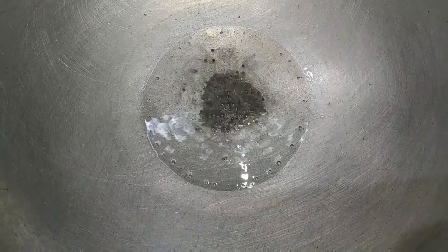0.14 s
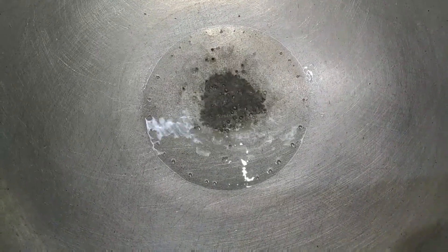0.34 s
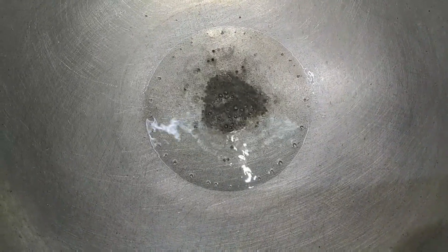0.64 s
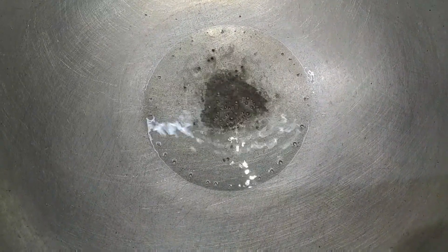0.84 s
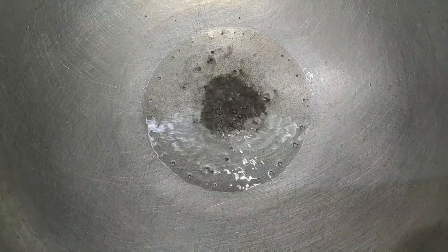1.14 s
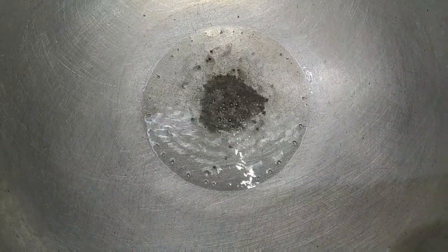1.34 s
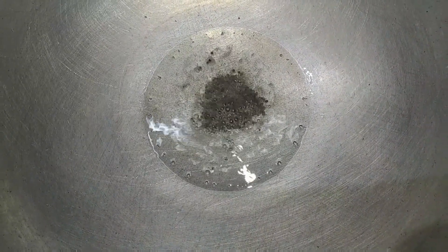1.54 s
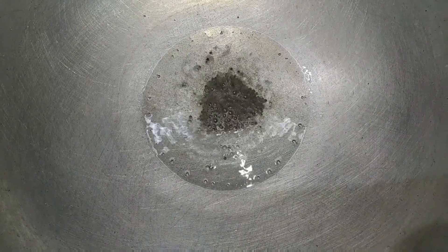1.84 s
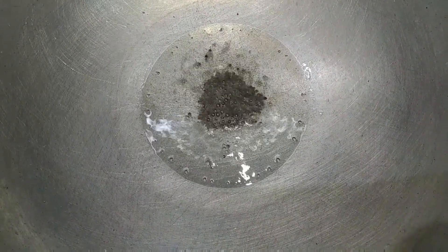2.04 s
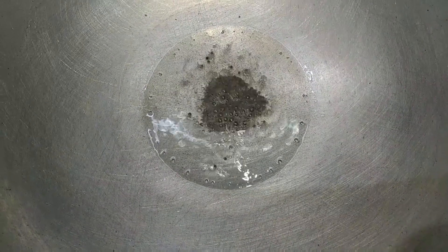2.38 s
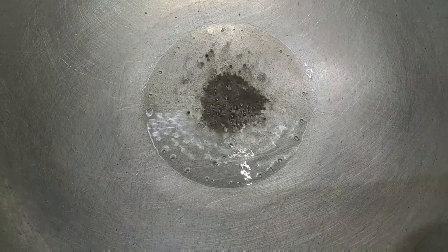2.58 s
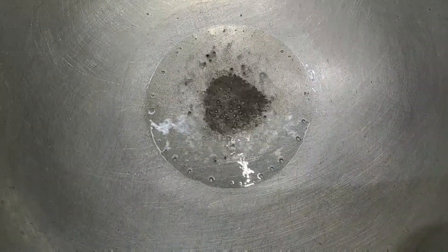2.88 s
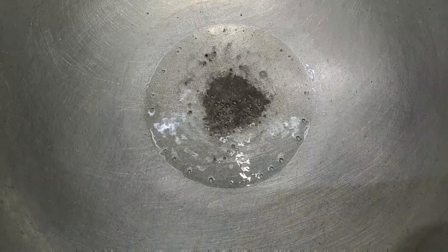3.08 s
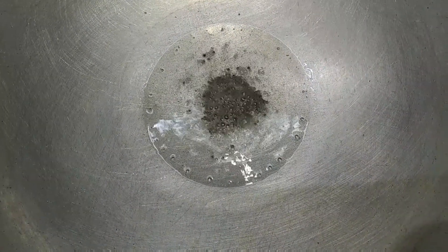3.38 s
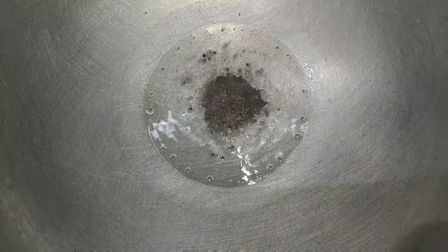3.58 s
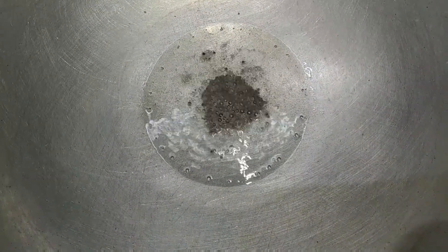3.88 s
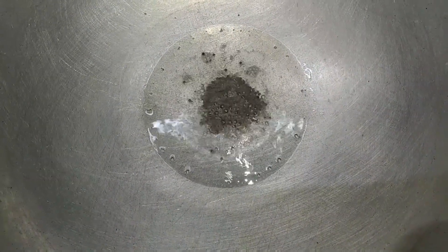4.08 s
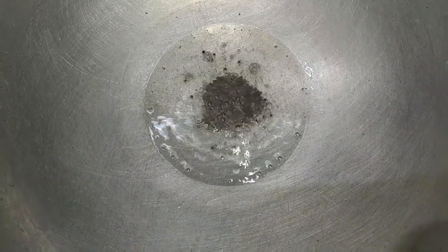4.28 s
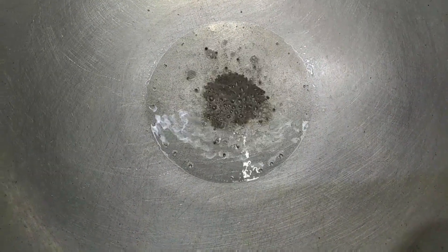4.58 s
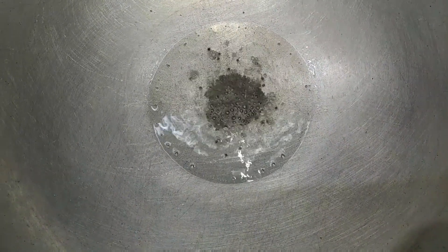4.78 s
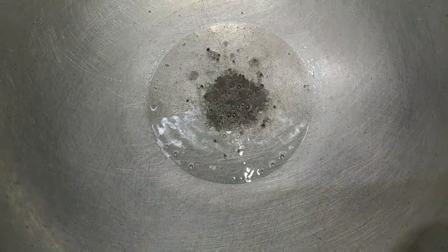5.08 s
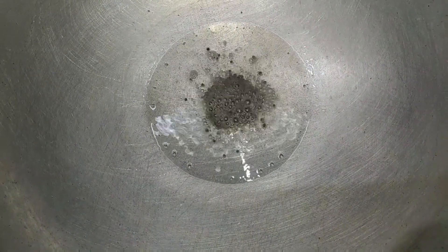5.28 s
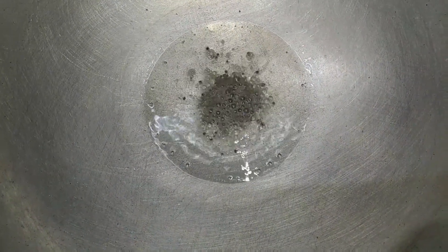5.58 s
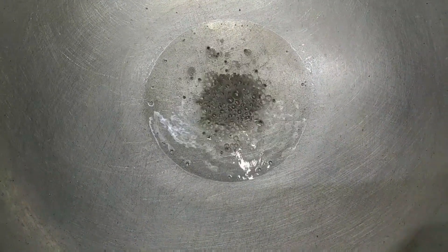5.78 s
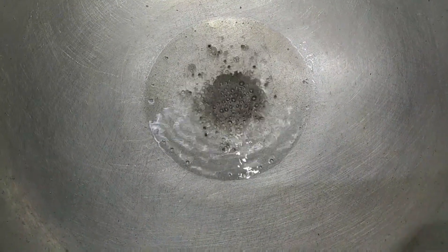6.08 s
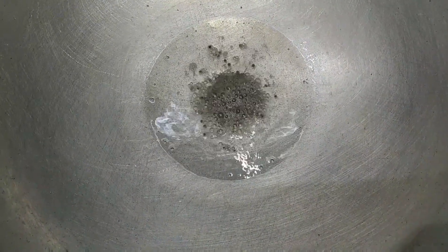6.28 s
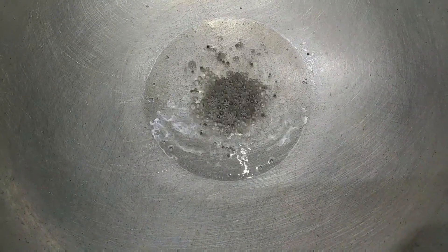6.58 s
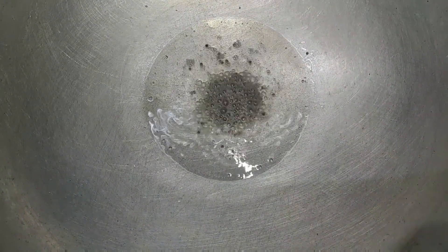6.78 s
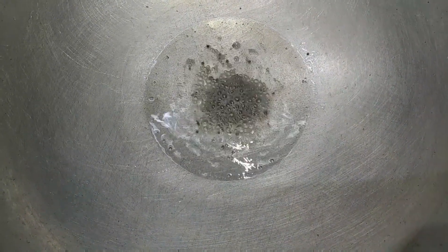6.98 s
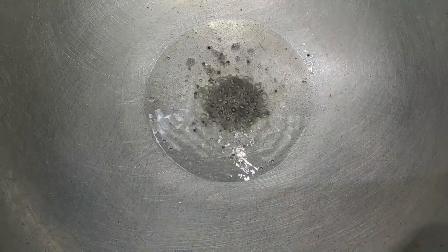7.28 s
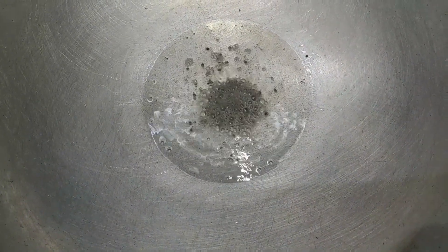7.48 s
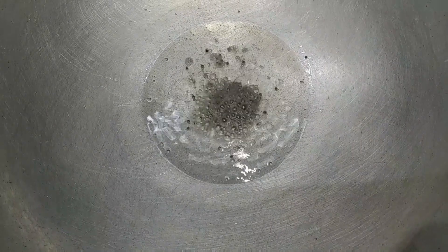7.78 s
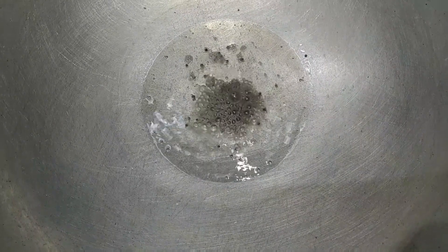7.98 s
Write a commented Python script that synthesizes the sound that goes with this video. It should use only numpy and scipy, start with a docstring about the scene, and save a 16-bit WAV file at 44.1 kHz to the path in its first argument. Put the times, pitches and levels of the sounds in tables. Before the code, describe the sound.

Seeds burst in hot oil in a metal bowl-shaped pan, heard close in stereo with a short, lightly reverberant kitchen echo. Pops begin sparse and weak apart from a sharp pair near one second, then gather from the middle onward into lively, uneven crackle, strongest around six seconds. Beneath them lie quiet fine sizzle, a thin whistling hiss, burner rumble, soft hum and a barely heard deep drone.

```python
"""First a soft fizz of oil, a thin high hiss and a low burner rumble; then mustard seeds splutter in a steel pan.
Each husk cracks and lets out a puff of steam: a sharp pulse, shaped noise and one short note, split into bands.
The pops ring the pan and a small kitchen, throw crackling droplets, and crowd together as the oil heats.
Fizz is many tiny grains of noise; hiss, whir and drone are noise through narrow resonances; the hum is a sine
with a little such noise. The drone has sine-based swells."""
import sys
import numpy as np
from scipy import signal
from scipy.fft import rfft, irfft
from scipy.io import wavfile
from scipy.ndimage import uniform_filter1d

SR = 44100
rng = np.random.default_rng(int(sys.argv[2]) if len(sys.argv) > 2 else 0)


def materialize(psi):
    """Save the field psi as 16-bit PCM at rate SR to the path in sys.argv[1].

    A 1-D psi becomes a single channel; in a 2-D psi each row is a channel.
    """
    bounded = np.clip(np.atleast_2d(psi).T, -1, 1)
    quanta = np.round(bounded * 32767).astype(np.int16)
    wavfile.write(sys.argv[1], SR, quanta)


N = 358974
TIME = np.arange(N) / SR

# Bursting seeds: start_s, level_db (rms over POP_S, before the colour of the bowl), pitch_hz,
# puff_t60_s (time to fall 60 dB), body_db (low band), snap_db (high band); both against the middle band
SEED_POPS = [(0.3783, -54, 4350, 0.012, -7.5, 5), (0.7779, -46.5, 5330, 0.013, -11, 1.5),
             (0.863, -45, 3690.0, 0.0084, 0.5, 8), (0.9392, -50, 2580.0, 0.014, -0.5, -8),
             (0.9812, -35, 2610, 0.012, 3.5, 9.5), (1.0155, -34.5, 4120, 0.019, -2, 0),
             (1.2228, -51.5, 4180, 0.067, -1.5, -3), (1.3793, -54.5, 3780, 0.023, -3.0, -10),
             (1.544, -49.5, 2560, 0.012, -2, -13), (1.721, -60.5, 2120, 0.037, 5, -8),
             (2.15, -50.5, 4330, 0.019, 0, -3), (2.3964, -39.5, 2660, 0.0097, 3, 3),
             (2.5453, -53, 4520.0, 0.013, -4.0, -2), (2.593, -47.5, 4550.0, 0.018, 2, -1.0),
             (2.6378, -41.5, 1690, 0.014, 6, -4.5), (2.696, -57.5, 2620, 0.023, 5, -8),
             (2.7978, -50.0, 3360, 0.023, -1, 5.0), (2.844, -49, 4500, 0.015, -8, 0.5),
             (3.1532, -39, 2500, 0.012, -6.5, 7), (3.2198, -43.0, 4640.0, 0.0097, -4, 1.5),
             (3.3748, -44.0, 3160, 0.0178, 0.0, -8), (3.5587, -51.5, 4800, 0.014, -4.5, 2),
             (3.5925, -50.5, 9400, 0.0082, -10.0, 7), (3.762, -46, 4300, 0.012, -7.0, 6.5),
             (3.894, -56.5, 1610, 0.082, 17, -7), (3.9358, -42, 4730, 0.021, -9.5, -2.0),
             (4.041, -41.5, 5260, 0.018, -3.5, -1.5), (4.1334, -30.5, 5200, 0.012, -1.5, 0.5),
             (4.2834, -45, 4500, 0.01, -16, 4.5), (4.3006, -44, 4180.0, 0.013, -8, 5),
             (4.3146, -41.5, 2610.0, 0.0172, -5.5, -4.5), (4.3424, -35, 2560, 0.0066, -2.0, 8.5),
             (4.4177, -48.5, 2760, 0.0479, -9, -2), (4.5542, -35, 2600, 0.013, -4, 3.5),
             (4.6736, -36.5, 4070, 0.013, -13.5, -4.5), (4.7055, -44, 2610.0, 0.043, -8, -4),
             (4.846, -42, 2560, 0.013, -6, 1), (4.8916, -36.5, 1796, 0.014, 8, 0.0),
             (4.9658, -54, 4340, 0.021, -11, -14), (5.0452, -47, 4400, 0.011, -4.0, -2),
             (5.0871, -47, 2540, 0.012, 6, -14), (5.1149, -34.5, 2580, 0.01, -8.5, -2.0),
             (5.2308, -43, 5120, 0.014, -4, -3.0), (5.3543, -48.0, 2150.0, 0.013, 6, 1.0),
             (5.3954, -38, 2630, 0.019, -2, -2.5), (5.4473, -47.5, 3810.0, 0.02, -9, -15),
             (5.4783, -35, 4340, 0.051, -4.5, 0.5), (5.5292, -46.5, 4400.0, 0.011, 5, -4.0),
             (5.5479, -32.5, 2250, 0.0095, -1, -1.5), (5.585, -43.5, 5460, 0.014, 3, 7),
             (5.6684, -35, 2580, 0.014, -8, -4), (5.7682, -45, 1550, 0.014, 6, 0.5),
             (5.903, -43.5, 2500, 0.0273, -2, 0.0), (5.934, -29.5, 4520, 0.016, -2, 5.5),
             (6.0221, -26, 3400, 0.014, -19, 3), (6.072, -39, 3620, 0.01, -1, -6),
             (6.1871, -42, 1950, 0.012, -1.5, 4.0), (6.223, -37, 2290, 0.0082, 6, -7.0),
             (6.2301, -33, 4500.0, 0.044, -0.5, -1), (6.3346, -40.5, 4040, 0.0186, 2, 5),
             (6.342, -33, 4270, 0.012, 2.5, -2), (6.392, -29, 3620, 0.0084, -1.5, 0.5),
             (6.6041, -47.5, 4100.0, 0.021, -4.0, -5), (6.625, -44, 4400, 0.023, -0.5, 0.5),
             (6.6926, -35, 2670, 0.01, -3.5, 2.5), (6.7212, -40.5, 1520, 0.034, 8, 8),
             (6.7775, -36.0, 2600, 0.02, -4.5, 1), (6.8675, -32.5, 4660, 0.016, -0.5, -5),
             (6.9353, -40.5, 3190.0, 0.021, -3, 3.5), (7.024, -43.5, 4470, 0.0236, -2.5, -2.0),
             (7.157, -43.5, 2620, 0.016, 2.5, -1.0), (7.1712, -39.0, 1630, 0.012, 7.5, 1.0),
             (7.2709, -37.5, 1920, 0.0092, 4, -4), (7.3103, -47, 2600, 0.0064, 7, -8),
             (7.3371, -45.5, 1860, 0.023, 5, 0), (7.417, -48, 1620, 0.016, 6, -6),
             (7.4664, -38, 2590, 0.02, -6.5, -8), (7.5535, -40.5, 8060.0, 0.014, 4, 24),
             (7.5831, -41.5, 2460, 0.011, 0, -1), (7.6209, -36, 4500, 0.0077, 8.5, -3.5),
             (7.7087, -39, 2320, 0.0089, 3.5, -3), (7.7433, -36.5, 4700, 0.028, -1, -6),
             (7.8575, -30.5, 2920, 0.011, -2.0, 4), (7.8976, -43, 2610.0, 0.0234, -9, 4.0),
             (8.0048, -50.0, 2680, 0.042, 13, -4.0), (8.0754, -41.5, 3200, 0.13, 0, -8)]
# Edges of the low, middle and high band of a pop: edge_hz
BAND_EDGES = [1200, 2600, 6000, 13000]
# Colour of the pops over the bowl of the pan: pitch_hz, gain_db
BOWL_COLOUR = [(300, 1), (1100, -3), (1500, -3), (3000, 2.5), (4500, 6), (6500, 1.5), (8200, 2),
               (11000, -5.5), (12700, -8.5), (14700, -47)]
# Ringing modes of the pan: pitch_hz, relative_level_db, t60_s
PAN_MODES = [(1660, 5, 0.0054), (2235, 9, 0.05), (2610, 4.5, 0.068), (3640, 3, 0.02), (4550, -0.5, 0.009),
             (5700, -4.5, 0.043), (7040, -4, 0.028)]
# Colour of the room echo: pitch_hz, gain_db
ECHO_COLOUR = [(200, 1.5), (1000, -3), (5000, -2), (14000, -5.5)]
# Level of the steady fizz: time_s, level_db
FIZZ_LEVEL = [(0, -62), (1.7, -61), (2.1, -56.5), (2.6, -59), (3.8, -59), (4.4, -55.5), (6.5, -56),
              (8.14, -54)]
# Spectrum of the steady fizz: pitch_hz, relative_level_db (per Hz)
FIZZ_SPECTRUM = [(500, 0.5), (2400, 2.5), (3200, -1.5), (4600, 7), (7000, 6.5), (9300, 6), (10800, -3),
                 (12500, -1), (13500, -31)]
# Level of one spurt as a wet spot boils off: time_s, level_db
SPURT_LEVEL = [(1.8, -67), (2.08, -58), (2.14, -49.5), (2.21, -55.5), (2.25, -45), (2.31, -44.5),
               (2.48, -68), (2.6, -92)]
# Spectrum of the spurt: pitch_hz, relative_level_db (per Hz)
SPURT_SPECTRUM = [(500, -8), (1100, -13.5), (1700, 0.5), (3800, -4), (7000, -2.5), (9300, 7), (11000, 0),
                  (12900, -7), (13600, -42)]
# Level of the thin hiss: time_s, level_db
HISS_LEVEL = [(0, -61.5), (2.6, -64), (3.9, -67), (5.9, -59), (8.14, -55)]
# Spectrum of the burner rumble: pitch_hz, relative_level_db (per Hz)
BURNER_SPECTRUM = [(20, 4), (145, 1), (350, -3.5), (480, -7.5), (680, -18), (830, -13), (2300, -17),
                   (5000, -63)]
# Thin whir beside the hum: pitch_hz, level_db, width_hz (of each of two resonances in a row)
WHIR_TONES = [(296.7, -74, 23), (831, -79, 76)]
# Swells of the deep drone: full_from_s, full_until_s, pitch_hz, level_db
DRONE_SWELLS = [(2.102, 2.8, 92.05, -67), (3.09, 3.31, 48, -66.5), (3.853, 4.295, 48, -64),
                (5.15, 6.1, 48, -62)]

SWELL_ATTACK_S, SWELL_RELEASE_S = 0.78, 0.1   # before and after the full part of a drone swell
POP_S = .01   # the span over which the level of a pop is counted
LOW_LASTS, HIGH_LASTS = 0.75, 0.66   # decay time of each band against that of the middle band
SWELL_IN_DB, SWELL_IN_S = -9, .0015   # soft noise that swells for a millisecond or two before each pop
TEAR_S, CRACK_S = .0008, .0003   # time the husk takes to tear, and spread in the arrival of the crack
CUTOFF_HZ = 14700


def from_db(db):
    """Turn decibels into a plain gain."""
    return 10 ** (np.asarray(db) / 20)


def rms_one(x):
    """Scale a sound to an rms of 1."""
    return x / np.sqrt(np.mean(x ** 2) + 1e-20)


def unit_energy(pops):
    """Scale each stereo pop to an energy of 1."""
    return pops / np.sqrt(np.sum(pops ** 2, axis=(1, 2), keepdims=True))


def level_over_time(rows):
    """Draw straight lines between the given levels, in dB, at every sample."""
    s, db = np.transpose(rows)
    return np.interp(TIME, s, db)


def stereo_noise(alike, size=N):
    """White noise at two microphones; alike is their correlation."""
    mid, side = rng.standard_normal((2, size))
    alike = np.clip(alike, -.99, .99)
    shared = np.sqrt(1 + alike) * mid
    opposed = np.sqrt(1 - alike) * side * [[1], [-1]]
    return (shared + opposed) / np.sqrt(2)


def coloured(x, spectrum):
    """Give a sound the listed spectrum, with a filter that never acts ahead of time (minimum phase)."""
    size = 8192
    hz, db = np.transpose(spectrum)
    grid = np.maximum(np.arange(size // 2 + 1) * SR / size, 1)
    gain = from_db(np.interp(np.log(grid), np.log(hz), db))
    # folding the cepstrum forward in time gives the minimum phase
    cepstrum = irfft(np.log(gain))
    cepstrum[1:size // 2] *= 2
    cepstrum[size // 2 + 1:] = 0
    response = irfft(np.exp(rfft(cepstrum)))
    return signal.oaconvolve(x, response[None], axes=1)[:, :N]


def resonance(x, hz, width_hz):
    """Two-pole resonance: rings at one pitch, longer when narrower, with a gain of about 1 on top."""
    r = np.exp(-np.pi * width_hz / SR)
    feed = np.array([1, 0, -1]) * (1 - r * r) / 2
    feedback = [1, -2 * r * np.cos(2 * np.pi * hz / SR), r * r]
    return signal.lfilter(feed, feedback, x + 1e-18)


def fading(kicks, t60):
    """Let every kick die away by 60 dB in t60 seconds."""
    return signal.lfilter([1], [1, -from_db(-60 / (t60 * SR))], kicks + 1e-18)


def narrow_noise(hz, width_hz, alike):
    """A wavering tone: noise sent twice through one resonance, rms 1."""
    run_in = SR // 2   # lets the resonance build up before the sound begins
    once = resonance(stereo_noise(alike, size=N + run_in), hz, width_hz)
    twice = resonance(once, hz, width_hz)
    return rms_one(twice[:, run_in:])


def drone(rest_hz, rest_db, waver, width_hz):
    """A deep wavering tone lies under everything; each of its swells rises, holds and fades."""
    out = from_db(rest_db) * narrow_noise(rest_hz, width_hz, 1.0)
    for start, end, hz, db in DRONE_SWELLS:
        rise, fade = (TIME - start) / SWELL_ATTACK_S, (end - TIME) / SWELL_RELEASE_S
        envelope = np.clip(np.minimum(rise, fade) + 1, 0, 1)
        tone = np.sin(2 * np.pi * hz * TIME) + waver * narrow_noise(hz, width_hz, 1.0)
        out = out + from_db(db) * envelope * rms_one(tone)
    return out


def stove(burner_db, hum_hz, hum_db):
    """The flame rumbles under the pan as coloured noise, over a steady hum and a thin whir."""
    out = from_db(burner_db) * rms_one(coloured(stereo_noise(0.91), BURNER_SPECTRUM))
    for hz, db, width_hz in WHIR_TONES:
        out = out + from_db(db) * narrow_noise(hz, width_hz, 0.84)
    hum = np.sin(2 * np.pi * hum_hz * TIME) + 0.37 * narrow_noise(hum_hz, 13, 1.0)
    return out + from_db(hum_db) * rms_one(hum)


def thin_hiss():
    """A narrow whistling hiss near the top of the fizz: noise around one high pitch."""
    return from_db(level_over_time(HISS_LEVEL)) * narrow_noise(9780, width_hz=750, alike=0.029)


def grains(spectrum, per_s, spread_db, smooth_db):
    """Many tiny bubbles, each a fast-fading hiss, merge with smooth noise into a sizzle; rms 1."""
    births = (rng.random(N) < per_s / SR) * from_db(-spread_db * rng.random(N))
    bubbles = rms_one(fading(births, t60=.005) * stereo_noise(0.0086))
    smooth = from_db(smooth_db) * stereo_noise(0.0094)
    return rms_one(coloured(bubbles + smooth, spectrum))


def fizz():
    """Moisture boils off in tiny bubbles all the time, and once in a bright, fluttering spurt."""
    steady = grains(FIZZ_SPECTRUM, per_s=290, spread_db=7, smooth_db=3.0)
    flutter = grains(SPURT_SPECTRUM, per_s=220, spread_db=12, smooth_db=-2)
    return from_db(level_over_time(FIZZ_LEVEL)) * steady + from_db(level_over_time(SPURT_LEVEL)) * flutter


def kitchen(x, early_db, early_t60, late_db, late_t60, gap_s):
    """Short reflections from the pan wall and the hob, and the longer tail of the room, as fading noise."""
    t = np.arange(SR * 3 // 4) / SR
    onset = 1 - np.exp(-(t / gap_s) ** 2)   # the echo builds up softly
    response = 0
    for db, t60 in ((early_db, early_t60), (late_db, late_t60)):
        tail = stereo_noise(0, size=len(t)) * from_db(-60 * t / t60) * onset
        response = response + from_db(db) * rms_one(tail) / np.sqrt(len(t))
    echo = signal.oaconvolve(x, response, axes=1)[:, :N]
    return coloured(echo, ECHO_COLOUR)


def pan_ring(x, ring_db):
    """The bowl rings briefly after each pop, damped by the oil: one resonance for each mode."""
    out = 0
    for k, (hz, db, t60) in enumerate(PAN_MODES):
        ring = resonance(x, hz, width_hz=np.log(1000) / (np.pi * t60))
        out = out + from_db(ring_db + db) * ring[::(-1) ** k]   # every other mode swaps left and right
    return out


def small_puffs(s, db, t60, width_share, lowest_hz, highest_hz, count=7):
    """Brief soft puffs of noise at the given times, each ringing one of a few broad resonances."""
    at = np.round(s * SR).astype(int)
    dealt = rng.integers(0, count, len(s))   # which resonance each puff rings
    noise, out = stereo_noise(0.062), 0
    for k, hz in enumerate(np.geomspace(lowest_hz, highest_hz, count)):
        width_hz = width_share * hz
        kicks = np.bincount(at[dealt == k], from_db(db[dealt == k]), N)[:N]
        ring = resonance(fading(kicks, t60) * noise, hz, width_hz)
        out = out + ring / np.sqrt(np.pi * width_hz / SR)   # makes up for what a narrow band lets through
    return out


def simmer(most_per_s, above_fizz_db, t60):
    """Small bubbles burst at random, ever more often as the oil heats, and follow the level of the fizz."""
    fizz_db = level_over_time(FIZZ_LEVEL)
    chance, size = rng.random((2, N))
    at = np.flatnonzero(chance < most_per_s * TIME / TIME[-1] / SR)
    db = fizz_db[at] + above_fizz_db + 9 * (size[at] ** 2 - 1)   # small ones up to 9 dB weaker
    return small_puffs(at / SR, db, t60, width_share=0.22, lowest_hz=1790, highest_hz=7500, count=12)


def band_shares(body_db, snap_db):
    """Gains of the low, middle and high band of each puff; their powers add up to 1."""
    gains = from_db([body_db, np.zeros_like(body_db), snap_db])
    return gains / np.sqrt(np.sum(gains ** 2, axis=0))


def spatter(level_db, flight_s, spread_db, count=5):
    """Each pop throws droplets that land and crackle a few hundredths of a second later."""
    s, pop_db, _, _, body_db, snap_db = np.transpose(SEED_POPS)[:, :, None]
    low, middle, _ = band_shares(body_db, snap_db)
    throw_db = pop_db + 20 * np.log10(np.hypot(low, middle))   # a thin, bright snap throws little oil
    flight = POP_S + flight_s * rng.exponential(1, (len(SEED_POPS), count))
    size_db = spread_db * rng.uniform(-1.8, 1, flight.shape)
    db = throw_db + level_db + size_db - 3 * flight / flight_s   # the far-flying ones are small
    landing_s = (s + flight).ravel()
    return small_puffs(landing_s, db.ravel(), t60=0.0034, width_share=0.48, lowest_hz=1670, highest_hz=7340)


def bounced(pops, echo, lag_s):
    """Each pop comes again off two walls of the bowl, once upside down, which ripples its spectrum."""
    lags = (lag_s * SR * rng.uniform(.3, 2, (len(pops), 2))).astype(int)
    out = []
    for pop, (one, other) in zip(pops, lags):
        out.append(pop + echo * (np.roll(pop, one, axis=1) - np.roll(pop, other, axis=1)))
    return np.array(out)


def seeds(crack_db, note_db, note_t60, ragged_db, thud_db, pan_db):
    """A pop swells in briefly, then cracks with ragged steam; each sets one note of the oily bowl ringing."""
    size, lead = 3000, 220   # samples in each pop, and how many of them come before its start
    count = len(SEED_POPS)
    t = (np.arange(size) - lead) / SR
    after = np.maximum(t, 0)
    # axes from here on: pop, microphone, sample
    s, level_db, note_hz, t60, body_db, snap_db = np.transpose(SEED_POPS)[:, :, None, None]
    t60 = np.maximum(t60, POP_S / 2)

    swell_in = from_db(SWELL_IN_DB) * np.exp(np.minimum(t, 0) / SWELL_IN_S)
    opening = np.minimum(swell_in + after / TEAR_S, 1)
    slow_noise = uniform_filter1d(rng.standard_normal((count, 1, size)), size=18)
    ragged = from_db(ragged_db * rms_one(slow_noise))
    arrival_s = TEAR_S + CRACK_S * rng.random((count, 2, 1))
    split = np.exp(-((t - arrival_s) * SR) ** 2)   # one sharp pulse, at its own moment in each microphone
    tone = np.sin(2 * np.pi * note_hz * (t - arrival_s)) * from_db(-60 * after / note_t60)
    note = unit_energy((t > arrival_s) * tone)

    edges = zip(BAND_EDGES, BAND_EDGES[1:])
    bands = [signal.butter(3, pair, "band", fs=SR, output="sos") for pair in edges]
    bands.append(signal.butter(2, [260, 1250], "band", fs=SR, output="sos"))   # a faint thud
    low, middle, high = band_shares(body_db, snap_db)
    thud = low ** 0.077 * from_db(thud_db)   # a little stronger in full-bodied pops
    pops = 0
    for band, share, lasts in zip(bands, (low, middle, high, thud), (LOW_LASTS, 1, HIGH_LASTS, 1)):
        band_t60 = lasts * t60
        crack = from_db(crack_db) * POP_S / band_t60 * split   # the quicker the puff, the harder the crack
        blow = from_db(-60 * (after / band_t60) ** 3.28)   # steam holds its pressure briefly, then runs out
        # every spot in the bowl reaches the two microphones with another phase and balance
        noise = np.array([stereo_noise(rng.uniform(-0.49, 0.35), size=size) for _ in range(count)])
        steam = crack + opening * ragged * blow * noise
        steam = unit_energy(bounced(steam, echo=0.6, lag_s=.0008))
        left_over_right_db = pan_db + 2 * rng.standard_normal(s.shape)
        sides = from_db(np.array([[1], [-1]]) * left_over_right_db / 2)
        puff = unit_energy(sides * signal.sosfilt(band, steam + from_db(note_db) * note))
        pops = pops + from_db(level_db) * share * puff * np.sqrt(2 * POP_S * SR)

    out = np.zeros((2, N + size + lead))
    for at, pop in zip(np.round(s.ravel() * SR).astype(int), pops):
        out[:, at:at + size] += pop
    return out[:, lead:lead + N]


def scene():
    """Pops ring the pan and the room, over the fizz, the hiss, the stove and a deep drone."""
    rumble = drone(rest_hz=48, rest_db=-76.5, waver=0.22, width_hz=7.8)
    rumble = rumble + stove(burner_db=-64.0, hum_hz=180.6, hum_db=-70.5)
    pops = simmer(most_per_s=110, above_fizz_db=2, t60=0.016)
    pops = pops + spatter(level_db=-11.0, flight_s=.036, spread_db=7.5)
    pops = pops + seeds(crack_db=14.5, note_db=-15, note_t60=.021, ragged_db=5.5, thud_db=-19, pan_db=-1.46)
    pops = coloured(pops, BOWL_COLOUR)
    pops = from_db(2.5) * pops + pan_ring(pops, ring_db=-3.5)
    room = kitchen(pops, early_db=-7.5, early_t60=0.037, late_db=-8.5, late_t60=0.32, gap_s=0.016)
    return rumble + thin_hiss() + fizz() + room + pops


def record(dry):
    """A steep low-pass filter cuts the top."""
    return signal.sosfilt(signal.ellip(10, .1, 80, CUTOFF_HZ, fs=SR, output="sos"), dry)


dry = scene()
out = record(dry)
materialize(out)
```